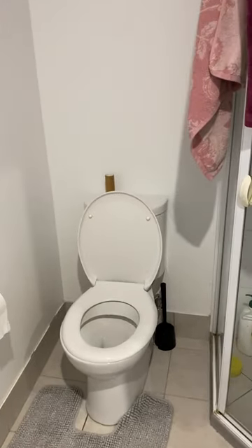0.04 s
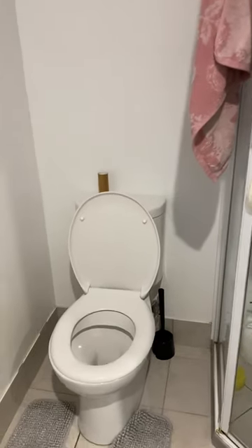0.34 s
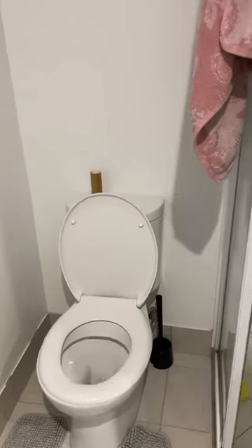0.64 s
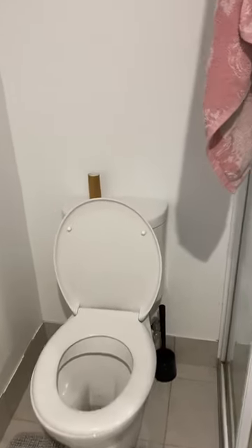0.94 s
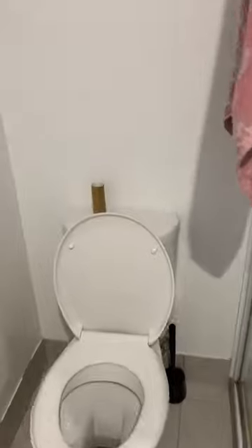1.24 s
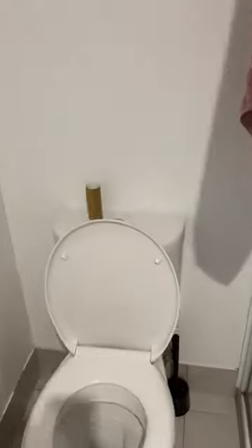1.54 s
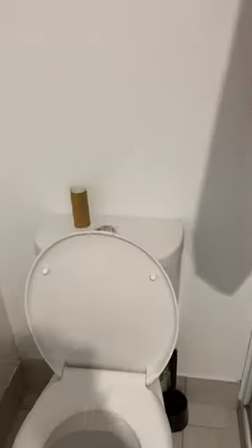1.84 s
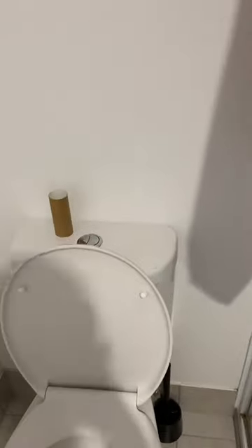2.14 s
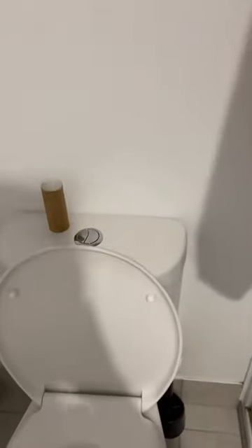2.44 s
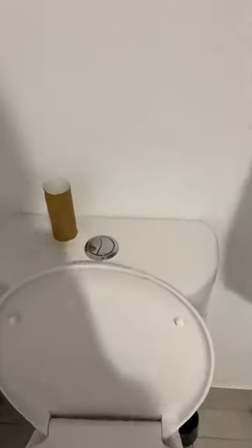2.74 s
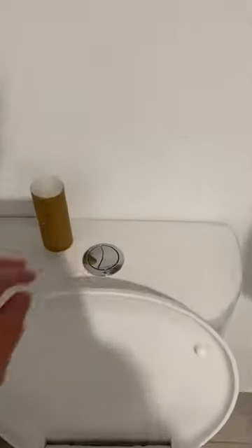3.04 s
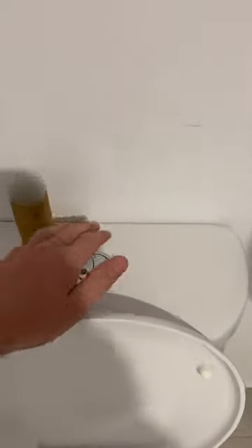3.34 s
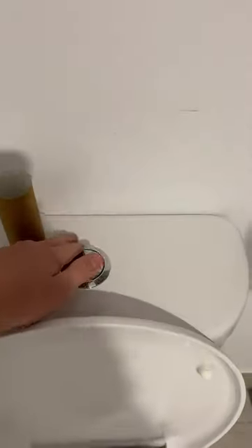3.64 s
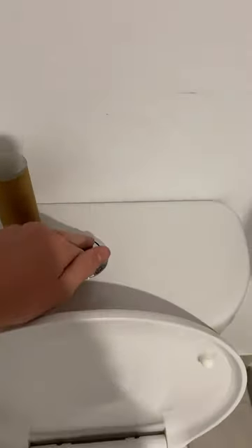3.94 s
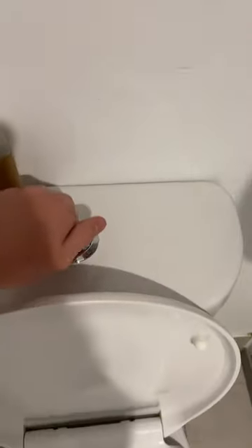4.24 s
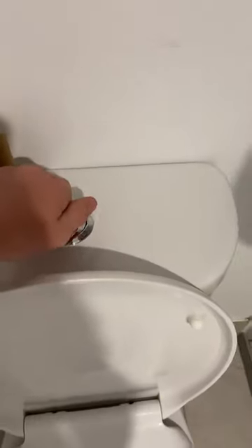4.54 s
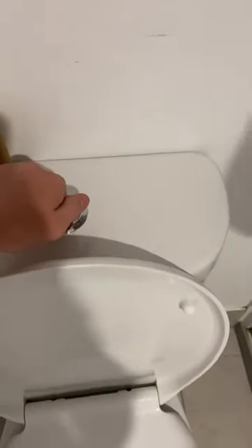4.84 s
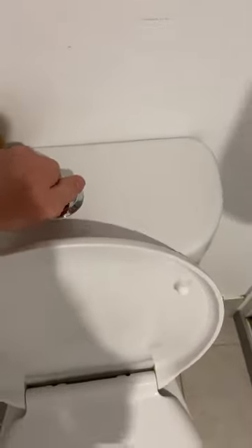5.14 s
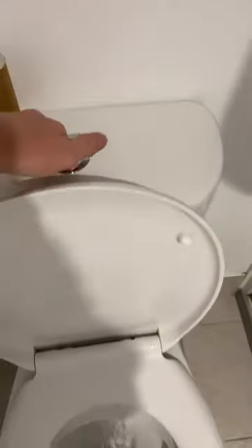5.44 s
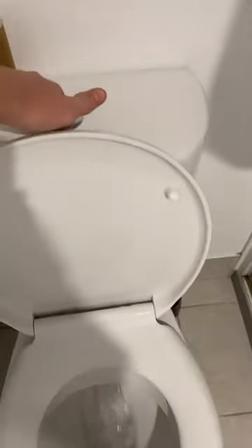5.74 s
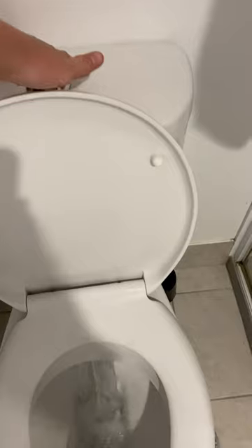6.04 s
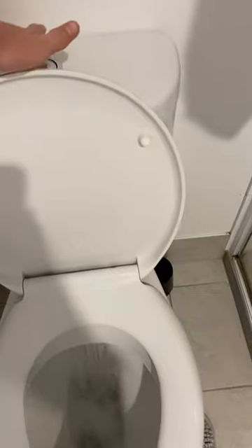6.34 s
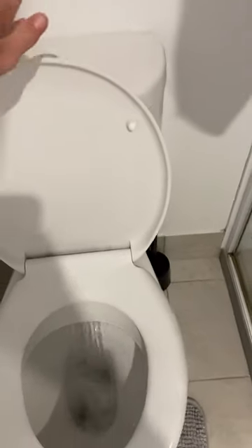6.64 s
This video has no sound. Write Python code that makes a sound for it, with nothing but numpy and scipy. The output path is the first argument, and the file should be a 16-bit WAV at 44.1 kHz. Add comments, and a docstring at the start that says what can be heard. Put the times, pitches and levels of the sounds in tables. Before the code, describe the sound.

For the first two seconds, a few faint footsteps and soft swishes of clothing cross a small tiled bathroom over quiet room tone. After a lull, fingers brush the toilet tank at about 3.6 seconds. At 4 seconds the plastic flush button snaps sharply, making the tank ring briefly, and a duller knock follows. From about 4.4 seconds water trickles down a hollow pipe, with deep glugs of air around 4.7. At 5 seconds it breaks into a loud rush round the bowl, with hissing spray, spatters, ringing bubbles and a low gurgle, strongest around 5.5 seconds. The flow then eases a little. At about 6.4 seconds the valve drops shut with a low thump, and water is still running at the end, near 6.7 seconds. A hand-held stereo microphone close above the tank catches the short echo of the tiles and slight handling rumble.

```python
"""Soft steps and swishing clothes cross a small tiled bathroom. At about 4 s a hand presses a toilet's
flush button, which snaps and makes the cistern (the water tank) ring. The valve lifts, water trickles
down the empty pipe, and pockets of air glug out of it. From about 5 s water rushes and spatters round
the bowl, full of ringing bubbles. Near the end the valve drops shut with a thump.
A hand-held stereo microphone, close above the cistern, hears it all with the echo of the tiles."""
import sys
import numpy as np
from scipy import signal
from scipy.fft import rfft, irfft
from scipy.io import wavfile
from scipy.ndimage import uniform_filter1d

SR = 44100
rng = np.random.default_rng(int(sys.argv[2]) if len(sys.argv) > 2 else 0)


def master(y):
    """Save y as 16-bit WAV."""
    cut = np.clip(np.atleast_2d(y).T, -1, 1)
    pcm = np.round(cut * 32767)  # scale
    wavfile.write(sys.argv[1], SR, pcm.astype(np.int16))


N = 294588
TIME, HZ = np.arange(N) / SR, np.fft.rfftfreq(N, 1 / SR)
AGE = np.arange(SR // 2) / SR  # seconds since a short sound began
RIM_S = 4.945  # when the water reaches the rim of the bowl
GURGLE_POWER = 0.65  # below 1, so the gurgle changes less than the flow does


def amp(db):
    """Turns decibels into a gain to multiply by."""
    return 10 ** (np.asarray(db) / 20)


def unit(x):
    """Scales a sound to an average (rms) level of 1."""
    return x / np.sqrt(np.mean(x ** 2) + 1e-20)


def read(points, hz):
    """Looks up values between the rows of a table, on a logarithmic frequency scale."""
    row_hz, value = np.transpose(points)
    return np.interp(np.log(hz + 1), np.log(row_hz + 1), value)


def add(mix, s, sound):
    """Mixes a sound in, starting at `s` seconds."""
    part = mix[max(round(s * SR), 0):][:len(sound)]
    part += sound[:len(part)]


def fade(t60):
    """A dying gain; the fade time `t60` is the seconds it takes to drop by 60 dB."""
    return amp(-60 * AGE / t60)


def rise(rise_s):
    """A gain that climbs from 0 towards 1, softening the start of a sound."""
    return 1 - np.exp(-AGE / rise_s)


def swell(start, length, peak):
    """A rounded rise and fall that tops out after the share `peak` of its length."""
    return np.sin(np.interp(TIME, start + length * np.array([0, peak, 1]), [0, np.pi / 2, np.pi]))


def surge(rate_hz, depth_db):
    """A gain that wavers at random round 1, most while trapped air makes the first rush sputter."""
    slow_band = (HZ > rate_hz / 5) / (1 + (HZ / rate_hz) ** 4)
    drift = unit(irfft(rfft(rng.standard_normal(N)) * slow_band, N))
    sputter = np.interp(TIME, [4.9, 5.35, 5.9], [.8, 1, .6])
    gain = amp(depth_db * drift * sputter)
    return gain / np.sqrt(uniform_filter1d(gain ** 2, size=SR // 5))


def colour(x, spectrum):
    """Gives a sound the tone of a spectrum table, at an average level of 1."""
    log_gain = np.log(amp(read(spectrum, abs(np.fft.fftfreq(8192, 1 / SR)))))
    taps = np.fft.ifft(np.exp(np.conj(signal.hilbert(log_gain)))).real  # keeps clicks sharp in front
    return unit(signal.oaconvolve(x, taps[:len(taps) // 2])[:len(x)])


def resonate(x, hz, width_hz):
    """Lets through the band round one pitch."""
    return signal.lfilter(*signal.iirpeak(hz, hz / min(width_hz, SR / 4), fs=SR), x)


def pipe_note(x, hz, width_hz):
    """Air in a pipe rings at one pitch; a second, wider filter trims the sound on either side."""
    return resonate(resonate(x, hz, width_hz), hz, 4 * width_hz)


def impacts(per_s, spread_db):
    """Tiny hits at random times, a few larger than the rest."""
    size = amp(spread_db * np.minimum(rng.exponential(1, N), 4.5))
    return unit(size * rng.choice([-1, 1], N) * (rng.random(N) < per_s / SR))


def bubble(hz, t60, swell_s, glide):
    """A pocket of air rings, its pitch creeping up by the share `glide` as it nears the surface."""
    shape = (1 - np.exp(-(AGE / swell_s) ** 2)) * fade(t60)
    pitch = hz * (1 + glide * np.minimum(AGE / t60, 1))
    return shape / shape.max() * np.sin(2 * np.pi * np.cumsum(pitch) / SR)


def ringing(notes):
    """A struck object rings with several notes, each dying at its own speed."""
    tones = sum(amp(db) * fade(t60) * np.sin(2 * np.pi * hz * AGE) for hz, db, t60 in notes)
    return tones * rise(0.00094)


def burst(hz, t60, breadth):
    """A dying puff of noise round one pitch; `breadth` is its width as a share of that pitch."""
    band = resonate(rng.standard_normal(len(AGE)), hz, hz * breadth)
    return unit(resonate(band, hz, hz * breadth)) * fade(t60)


def reflections():
    """The tiles answer a click with dense echoes, each frequency dying at its own speed."""
    # how long the room rings: (frequency [Hz], fade time [s])
    fade_times = [(100, 1), (400, 0.64), (1000, 0.45), (2800, 0.42), (7000, 0.26), (16000, 0.37)]
    taps = rng.choice([-1., 1.], len(AGE)) * (rng.random(len(AGE)) < 4000 / SR) * (AGE > .003)
    hz, t, bands = signal.stft(taps, SR, nperseg=256)
    t60 = read(fade_times, hz)[:, None]
    tail = signal.istft(bands * amp(-60 * t / t60) / np.sqrt(t60), SR, nperseg=256)[1]
    return tail / np.linalg.norm(tail)


def echoes(x, count):
    """Water and microphone keep moving, so the sound passes in turn through several echo patterns."""
    turns = 2.7 * TIME
    shares = [np.sqrt(2 / count) * np.cos(2 * np.pi * (turns + k / count)) for k in range(count)]
    return sum(signal.oaconvolve(x * share, reflections())[:N] for share in shares)


def bathroom(sources):
    """Returns the sound from the front and the sound from the side walls, each with its own echoes."""
    direct = sum(x / np.sqrt(1 + amp(echo_db) ** 2) for x, echo_db in sources)
    to_tiles = sum(x * amp(echo_db) / np.sqrt(1 + amp(echo_db) ** 2) for x, echo_db in sources)
    # the near walls smear the sideways sound over a few milliseconds
    hz = np.fft.rfftfreq(2048, 1 / SR)
    delay_s = np.interp(hz, np.linspace(0, SR / 2, 90), rng.uniform(.002, .012, 90))
    smear = irfft(np.exp(-2j * np.pi * np.cumsum(delay_s) * hz[1]))
    sideways = signal.oaconvolve(direct, smear)[:N]
    return [x + echoes(to_tiles, count=3) for x in (direct, sideways)]


def microphones(front, sideways):
    """Left and right share the sound from the front and hear the sideways sound with opposite signs."""
    # the microphone pair: (frequency [Hz], likeness of the sides [0 to 1], left's lead [radians])
    pair = [(0, 1, 0), (200, .99, .05), (500, .87, .45), (900, .9, .1), (1250, .82, .05), (2100, .96, .05),
            (2600, .7, .85), (3500, .73, .4), (4300, .72, .75), (5000, .89, .15), (5600, .8, .55),
            (6200, .77, 2.1), (6900, .99, 3.1), (7600, .99, 3.15), (8100, .9, 3.4), (8800, .73, 4.6),
            (9800, .99, 6.25), (11000, .99, 6.3), (11800, .7, 7.6), (12500, .85, 9), (13200, .99, 9.4),
            (13900, .99, 9.45), (14700, .6, 10), (15800, .7, 12.4)]
    # which side is louder: (frequency [Hz], left minus right [dB])
    balance = [(60, 1), (130, -1.5), (280, -3.5), (500, -3), (1200, 1.9), (2800, -1.5), (5000, -2.5),
               (16000, 0)]
    hz, likeness, lead = np.transpose(pair)
    same = np.interp(HZ, hz, likeness)
    shared = rfft(front) * np.sqrt((1 + same) / 2)
    apart = rfft(sideways) * np.sqrt((1 - same) / 2)
    leftward = np.exp(1j * np.interp(HZ, hz, lead) / 2) * amp(read(balance, HZ) / 2)
    return irfft(np.array([(shared + apart) * leftward, (shared - apart) / leftward]), N)


def room_tone():
    """The quiet, steady, mostly low noise of the room."""
    # tone of the room's air: (frequency [Hz], relative level [dB])
    air_tone = [(20, -25), (36, -9), (50, 0), (75, -7.5), (110, -10), (170, -10.5), (380, -21),
                (700, -30.5), (1700, -29.5), (2500, -30.5), (5000, -34.5), (10000, -44), (16000, -56)]
    return amp(-65) * colour(rng.standard_normal(N), air_tone)


def handling():
    """The hand that holds the microphone makes a low rumble."""
    # tone of the grip: (frequency [Hz], relative level [dB])
    grip_tone = [(20, -16), (45, 1.5), (75, -0.5), (105, -5), (160, -27), (300, -9.5), (1000, -84.5)]
    # the grip shifts on reaching out and on pressing: (start [s], length [s], level [dB])
    shifts = [(2.45, 1.05, -65), (3.6, 1.1, -55)]
    shifting = sum(amp(db) * swell(start, length, peak=0.59) ** 2 for start, length, db in shifts)
    return colour(rng.standard_normal(N), grip_tone) * (amp(-65.5) + shifting)


def clothes():
    """Rubbing cloth rustles faintly all through the walk and swishes with each stride."""
    # tone of the cloth: (frequency [Hz], relative level [dB])
    cloth_tone = [(150, -3.5), (350, 8), (700, 4.5), (2000, 3.5), (5000, 0.5), (8000, -4), (12000, -7.5),
                  (16000, -29)]
    # strides, then the hand brushing the cistern: (start [s], length [s], level [dB])
    swishes = [(.1, .54, -62.5), (.96, .28, -62.5), (1.2, .33, -63.5), (1.72, .36, -57), (2.3, .25, -66.5),
               (3.52, .15, -63)]
    swishing = sum(amp(db) * swell(start, length, peak=.53) ** 1.15 for start, length, db in swishes)
    rustling = amp(-72) * swell(start=-.6, length=3.3, peak=0.77)
    cloth = colour(impacts(per_s=9800, spread_db=1.5), cloth_tone)
    return cloth * np.hypot(swishing, rustling) * surge(rate_hz=22, depth_db=2.6)


def footsteps():
    """Each foot lands with a dull thud, a hollow sound from the floor and a light heel click."""
    # steps on the tiles: (time [s], thud [dB], heel click [dB], hollow floor [dB])
    steps = [(0.088, -50.5, -64, -56), (0.988, -47, -46, -59), (1.061, -49.5, -60, -63),
             (1.31, -56, -80, -50), (1.699, -44, -41.5, -43), (1.753, -48, -39.5, -53)]
    # tone of a thud: (frequency [Hz], relative level [dB])
    thud_tone = [(40, -4), (100, 7), (200, 5), (350, -4), (600, -2.5), (1000, -9), (2200, -18), (4000, -21),
                 (12000, -35)]
    out = np.zeros(N)
    for s, thud_db, heel_db, floor_db in steps:
        thud = colour(rng.standard_normal(len(AGE)), thud_tone) * fade(0.12) * rise(0.00062)
        floor = burst(hz=335, t60=0.15, breadth=0.73)
        heel = burst(hz=1060, t60=0.018, breadth=1.23)
        add(out, s, amp(thud_db) * thud + amp(floor_db) * floor + amp(heel_db) * heel)
    return out


def button():
    """Each snap of the plastic button cracks and rings the cistern; duller knocks come around them."""
    # the button snaps over: (time [s], crack [dB], cistern ring [dB])
    snaps = [(3.951, -11.5, -31), (3.9545, -11.5, -24), (3.9579, -9.5, -45), (3.9987, -21, -43),
             (4.005, -24.5, -27.5)]
    # tone of a crack: (frequency [Hz], relative level [dB])
    crack_tone = [(100, -6.5), (400, 11.5), (660, 3), (900, 11), (1400, 3.5), (2200, 3.5), (4000, 0),
                  (5600, 9), (7500, 3.5), (10000, -9), (16000, -21)]
    # notes of the cistern and its lid: (pitch [Hz], relative level [dB], fade time [s])
    cistern_notes = [(157.8, -20, 0.5), (305, -1, 0.4), (335, -3, 0.08), (535, -8, 0.28), (888, -2, .13),
                     (1004, -11, 0.08), (1150, -7, .14), (1798, -17, 0.08), (2056, -10, 0.09),
                     (2449, -10, 0.09), (3004, -13, .09), (3499, -13, .08), (4005, -8, 0.07),
                     (5005, -13, .08), (5459, -9, 0.07)]
    # knocks of fingers on the lid and of the levers inside:
    # (time [s], level [dB], pitch [Hz], fade time [s], width [share of the pitch])
    knocks = [(3.6, -55.5, 517, 0.16, 0.39), (3.638, -57, 696, 0.094, 1), (3.824, -49.5, 480, 0.31, 0.96),
              (3.851, -41, 2320, 0.011, 0.5), (3.937, -44, 1260, 0.17, 0.17), (3.958, -21, 161, 0.14, 1),
              (3.995, -22.5, 167, 0.14, 0.67), (4.002, -16.5, 935, 0.028, 0.7), (4.2, -42, 497, 0.1, 0.47),
              (4.218, -28.5, 420, 0.21, 0.85), (4.221, -39.5, 1070, 0.064, 0.36),
              (4.237, -49, 8800, 0.075, 0.85), (4.348, -52, 1035, 0.37, 0.64)]
    # faint tick of the button's metal cap: (pitch [Hz], level [dB], fade time [s])
    cap_notes = [(4070, -47.5, .085), (4180, -53, .04), (5050, -55, .04), (5400, -54, .04)]
    out, ring = np.zeros(N), ringing(cistern_notes)
    for s, crack_db, ring_db in snaps:
        crack = colour(rng.standard_normal(len(AGE)), crack_tone) * fade(.017)
        add(out, s, amp(crack_db) * crack + amp(ring_db) * ring)
    for s, db, hz, t60, breadth in knocks:
        add(out, s, amp(db) * burst(hz, t60, breadth) * rise(3 / hz))  # low knocks swell more slowly
    add(out, 3.8, ringing(cap_notes))
    return out


def flow():
    """How strongly the water runs: it starts as a trickle, peaks, and sags as the cistern empties."""
    # water leaving the cistern: (time [s], level [dB])
    levels = [(4.33, -57), (4.47, -39), (4.56, -31.5), (4.62, -22), (4.89, -18.5), (4.96, -8.5), (5.37, -8),
              (5.5, -2), (5.66, -2.5), (6.05, -8), (6.47, -9.5), (6.68, -15)]
    return amp(np.interp(TIME, *np.transpose(levels), left=-200))  # silent before the valve lifts


def trickle():
    """The first drops ring the empty pipe hollowly until it fills."""
    # notes of the empty pipe: (pitch [Hz], width [Hz], relative level [dB])
    notes = [(727, 36, -2), (1100, 33, 1), (1625, 90, -1), (2010, 50, -6), (2450, 70, -10),
             (2900, 120, -14), (3320, 100, -14), (3950, 65, -15), (5200, 120, -15)]
    drops = impacts(per_s=2500, spread_db=4.5)
    hollow = unit(sum(amp(db) * unit(pipe_note(drops, hz, width)) for hz, width, db in notes))
    shape = swell(start=4.3, length=0.75, peak=0.75) ** 2.4
    return amp(-37.5) * hollow * shape * surge(rate_hz=27, depth_db=5)


def pipe():
    """The pipe gurgles and rumbles with the flow, and harder with each gulp of air."""
    # notes of the air in the pipe and bowl: (pitch [Hz], width [Hz], relative level [dB])
    notes = [(222, 24, -2), (268, 21.7, 5.5), (307.5, 22, -1), (355, 27.4, 2), (417, 48, -2)]
    # tone of the rumble: (frequency [Hz], relative level [dB])
    rumble_tone = [(20, -13), (45, -23), (70, -1), (92, -2), (125, -8), (160, -2), (200, -35), (400, -2),
                   (2000, -35.5)]
    # gulps of air churn the water: (start [s], length [s], gurgle [dB], rumble [dB])
    gulps = [(4.564, 0.22, -39, -48), (4.671, 0.3, -18.5, -34.5), (5.002, 0.15, -32, -46),
             (5.402, 0.27, -26, -29), (6.375, 0.24, -32.5, -28.5)]
    gurgle = np.zeros(N)
    for hz, width, db in notes:
        drops = impacts(per_s=400, spread_db=6.0)
        gurgle += amp(db) / np.sqrt(width) * pipe_note(drops, hz, width)
    rumble = colour(impacts(per_s=300, spread_db=3), rumble_tone)
    gurgle_gain = amp(-29.5) * flow() ** GURGLE_POWER
    rumble_gain = amp(-32) * flow() ** 0.54
    for start, length, gurgle_db, rumble_db in gulps:
        gulp = swell(start, length, peak=0.26) ** 2
        gurgle_gain = np.hypot(gurgle_gain, amp(gurgle_db) * gulp)
        rumble_gain = np.hypot(rumble_gain, amp(rumble_db) * gulp)
    return unit(gurgle) * gurgle_gain + rumble * rumble_gain


def chugs(count=38):
    """Small air pockets follow one another up the pipe, each at its own pitch, so the gurgle wavers."""
    out, strength = np.zeros(N), flow()
    for k, (when, pitch, size) in enumerate(rng.random((count, 3))):
        s = RIM_S + (TIME[-1] - RIM_S) * (k + when) / count
        gain = amp(-30.5 + 7 * size) * np.interp(s, TIME, strength) ** GURGLE_POWER
        hz = 304.4 * (1 + 0.14 * (2 * pitch - 1))
        add(out, s, gain * bubble(hz, t60=0.1, swell_s=0.0095, glide=0.04))
    return out


def valve():
    """Air glugs up the pipe once the valve opens; later it drops shut with a knock and a thump."""
    # air pockets leaving the pipe: (time [s], level [dB], pitch [Hz], fade time [s])
    glugs = [(4.43, -49, 1100, 0.29), (4.513, -41, 1108, 0.2), (4.578, -36.5, 1646, 0.089),
             (4.598, -33, 1099, 0.079), (4.612, -35.5, 734, 0.39), (4.7, -12.5, 224.3, 0.344),
             (4.728, -8, 241.6, 0.17), (4.765, -14.5, 398, 0.043), (4.781, -18, 272, 0.3),
             (4.807, -18, 446, 0.07), (5.018, -24.5, 311, 0.22), (5.14, -24.5, 336.4, 0.13),
             (5.274, -19.5, 265, 0.084), (5.378, -19.5, 353, 0.25), (5.417, -26, 338, 0.07),
             (5.455, -13.5, 340.3, 0.24), (5.458, -18, 271, 0.11), (5.49, -16, 267.4, 0.17),
             (5.534, -19.5, 277, 0.16), (5.575, -21, 263, 0.1), (5.615, -19.5, 296, 0.087),
             (5.666, -23, 295, 0.12), (5.696, -23.5, 317, 0.074), (6.435, -23.5, 228, 0.31)]
    # the water in the pipe thumps with big gulps, hardest as the valve shuts, then bounces back:
    # (time [s], level [dB], pitch [Hz], fade time [s])
    thumps = [(5.02, -33, 71, 0.3), (5.461, -30, 90.5, .12), (5.624, -31, 79, 0.063),
              (6.399, -13.5, 70.1, 0.21), (6.506, -23, 71, 0.22)]
    out = np.zeros(N)
    for s, db, hz, t60 in glugs:
        add(out, s, amp(db) * bubble(hz, t60, swell_s=0.0042, glide=0.088))
    for s, db, hz, t60 in thumps:
        add(out, s, amp(db) * bubble(hz, t60, swell_s=0.022, glide=0.023))
    closing_knock = burst(hz=185, t60=0.39, breadth=1.0) * rise(0.014)
    add(out, 6.41, amp(-26) * closing_knock)
    return out


def spits():
    """Air and droplets spit from the rim in short, bright bursts."""
    # spits at the rim: (time [s], level [dB], pitch [Hz], fade time [s])
    bursts = [(4.504, -34, 10000, 0.1), (4.562, -40, 9900, 0.18), (4.652, -22, 9700, 0.035),
              (4.691, -31.5, 8800, 0.12), (4.813, -28.5, 10400, .04), (4.961, -17.5, 5940, 0.11),
              (5.05, -21, 7900, 0.11), (5.134, -20, 9550, 0.067), (5.186, -24, 10000, 0.034),
              (5.212, -19.5, 5000, 0.042), (5.228, -18, 6000, 0.037), (5.26, -19.5, 6500, .04),
              (5.295, -5.5, 8000, 0.021), (5.327, -16.5, 8000, 0.033), (5.373, -16, 7000, 0.042),
              (5.55, -12, 9450, 0.043), (5.65, -20, 5430, 0.058), (5.758, -17, 10600, 0.041),
              (6.411, -11, 8000, 0.029), (6.522, -14, 7900, 0.024), (6.579, -2, 6050, 0.014)]
    out = np.zeros(N)
    for s, db, hz, t60 in bursts:
        add(out, s, amp(db) * burst(hz, t60, breadth=0.83) * rise(0.0025))
    return out


def stray_bubbles(count=50):
    """Yields (time, level, pitch) of random bubbles, louder when more water flows."""
    strength = flow()
    for k, (when, pitch, size) in enumerate(rng.random((count, 3))):
        s = RIM_S + (TIME[-1] - RIM_S) * (k + when) / count
        db = -27.5 + 4 * size + 10 * np.log10(np.interp(s, TIME, strength))
        # the churning bowl breaks bubbles up smaller, so their pitch climbs
        octaves = 0.436 * (s - RIM_S) + 0.645 * (2 * pitch - 1)
        yield s, db, 1220 * 2 ** octaves


def spatter():
    """Single ringing bubbles and slaps of water stand out of the rush."""
    # the loudest bubbles in the bowl: (time [s], level [dB], pitch [Hz])
    loud_bubbles = [(4.737, -21, 770), (4.823, -20, 846), (4.908, -24, 900), (4.946, -21.5, 840),
                    (4.973, -22, 3165), (5.02, -19, 903), (5.046, -22, 880), (5.051, -15, 1098),
                    (5.053, -12, 1950), (5.055, -16, 2270), (5.056, -15.5, 3630), (5.07, -12.5, 892),
                    (5.152, -18.5, 886), (5.165, -21.5, 1876), (5.168, -18, 838), (5.213, -24.5, 1494),
                    (5.215, -25, 1780), (5.262, -19.5, 690), (5.279, -19, 921), (5.418, -22.5, 1800),
                    (5.444, -21, 2030), (5.453, -18, 875), (5.467, -21.5, 2100), (5.47, -19, 1730),
                    (5.486, -21, 2570), (5.489, -21.5, 3050), (5.52, -19, 2070), (5.522, -22, 1590),
                    (5.523, -17.5, 882), (5.588, -19.5, 2270), (5.633, -21, 1820), (5.637, -16.5, 920),
                    (5.648, -15.5, 4070), (5.65, -20, 1880), (5.652, -17, 2250), (5.838, -24, 1885),
                    (5.86, -25, 1605), (5.874, -26, 1150), (5.933, -22.5, 1690), (5.977, -26.5, 1254),
                    (5.979, -22, 1630), (6.036, -20.5, 2895), (6.064, -21, 2070), (6.125, -21.5, 1620),
                    (6.149, -17, 1412), (6.191, -21, 1150), (6.204, -20.5, 2026), (6.229, -19.5, 1208),
                    (6.248, -24, 2150), (6.329, -23.5, 1614), (6.4, -16.5, 844), (6.428, -16, 1210),
                    (6.465, -27, 1450)]
    # water slapping the porcelain: (time [s], level [dB], pitch [Hz], fade time [s])
    slaps = [(4.705, -22, 760, 0.31), (4.769, -25.5, 735, 0.23), (5.024, -24.5, 840, 0.6),
             (5.048, -11, 1920, 0.073), (5.138, -21, 2440, 0.038), (5.169, -23, 1820, 0.055),
             (5.257, -15, 2400, 0.029), (5.262, -25, 690, 0.14), (5.523, -11, 1790, 0.054),
             (5.648, -16, 2740, 0.034), (6.395, -13, 550, 0.067), (6.43, -23, 1400, 0.11)]
    out = np.zeros(N)
    for s, db, hz in [*loud_bubbles, *stray_bubbles()]:
        t60 = min(.05, 42 / hz)  # small, high bubbles die sooner
        add(out, s, amp(db) * bubble(hz, t60, swell_s=0.0027, glide=0.048))
    for s, db, hz, t60 in slaps:
        add(out, s, amp(db) * burst(hz, t60, breadth=.7) * rise(.004))
    return out


def froth(sizes):
    """Swarms of small bubbles ring at random times; bubbles of similar size swell together."""
    out = np.zeros(N)
    for pitches in np.array_split(np.geomspace(480, 4200, sizes), sizes // 4):
        rings = [bubble(hz * rng.uniform(0.98, 1.03), t60=30 / hz, swell_s=1.46 / hz, glide=0.032)
                 for hz in pitches]
        swarm = np.zeros(N)
        for hz, ring in zip(pitches, rings):
            pops = impacts(per_s=36, spread_db=2.2)
            swarm += signal.oaconvolve(pops, ring[:SR // 16])[:N] * hz ** 1.5
        out += swarm * surge(rate_hz=30, depth_db=4.5)
    return out


def rush():
    """The flow drives a fluttering sheet of water and foam in the bowl, and spray from the rim."""
    # tone of the splashing in the bowl: (frequency [Hz], relative level [dB])
    splash_tone = [(200, -43.5), (450, -1.5), (600, -3.5), (900, -1), (1150, -3), (1400, -4), (1950, -4),
                   (2600, -8), (3800, -14.5), (6000, -19), (16000, -104)]
    # tone of the spray: (frequency [Hz], relative level [dB])
    spray_tone = [(500, -6.5), (1500, -19), (3000, -1.5), (5200, 8), (7500, -2), (10000, 3.5),
                  (13000, -2.5), (16000, -6)]
    sheet = amp(-25) * colour(impacts(per_s=3000, spread_db=0.5), splash_tone)
    foam = amp(-23.5) * colour(froth(sizes=40), splash_tone)
    spray = amp(-25.5) * colour(impacts(per_s=5000, spread_db=3.4), spray_tone)
    spray *= surge(rate_hz=54, depth_db=3)
    # the spray is weak until the water reaches the rim, then fades as the cistern's level drops
    arrival_db = np.interp(TIME, [RIM_S, RIM_S + 0.027], [-6.5, 0])
    draining_db = -2 * np.maximum(TIME - RIM_S, 0)
    bowl = (sheet + foam) * surge(rate_hz=30, depth_db=2.2) * flow()
    return bowl + spray * amp(arrival_db + draining_db) * flow() ** 0.68


def scene():
    """The walk and the flush sound in one small, hard room, over room tone and the rumble of the hand."""
    # (sound, echo compared with direct sound [dB])
    sources = [(rush(), -3.5), (trickle(), -6), (pipe(), -9), (spatter(), -7), (spits(), -7),
               (valve() + chugs(), -14), (button(), -5.5), (clothes() + footsteps(), 0)]
    hand = handling()
    soft_ends = signal.windows.tukey(N, 200 / N)
    front, sideways = [(x + hand + room_tone()) * soft_ends for x in bathroom(sources)]
    return microphones(front, sideways)


def record(dry):
    """Cuts the deepest bass, below 31 Hz, and the highest treble, above 15900 Hz."""
    bass_cut = signal.butter(4, 31, "highpass", fs=SR, output="sos")
    treble_cut = signal.firwin(511, 15900, window=("kaiser", 9), fs=SR)
    return signal.oaconvolve(signal.sosfilt(bass_cut, dry), treble_cut[None], "same")


dry = scene()
out = record(dry)
master(out)
```